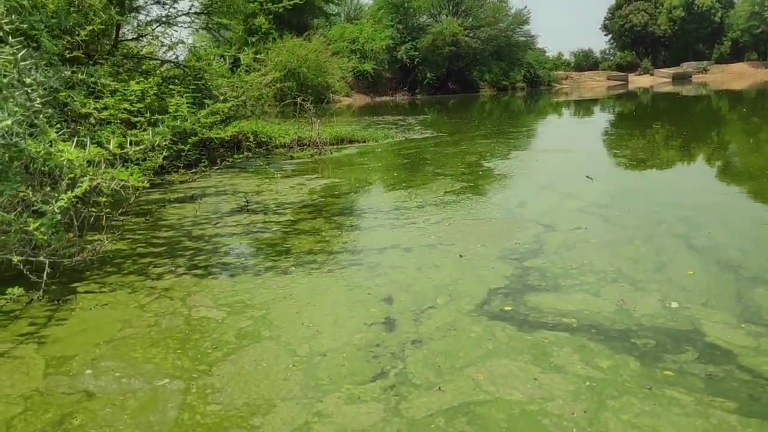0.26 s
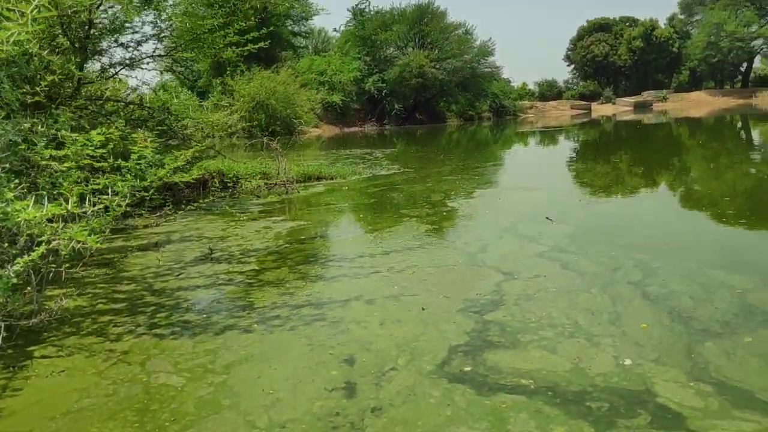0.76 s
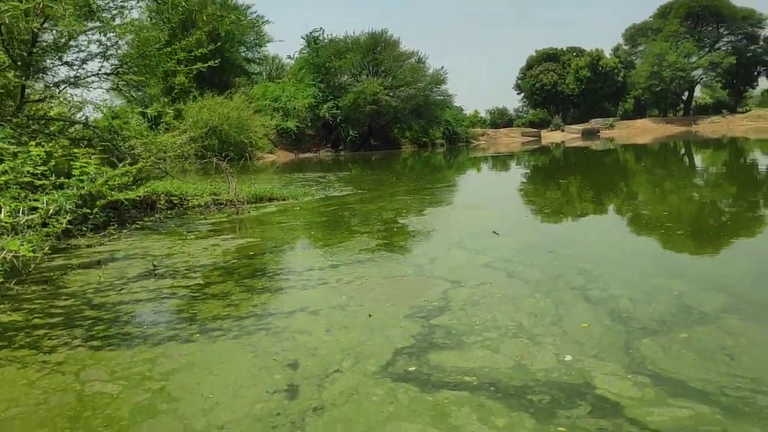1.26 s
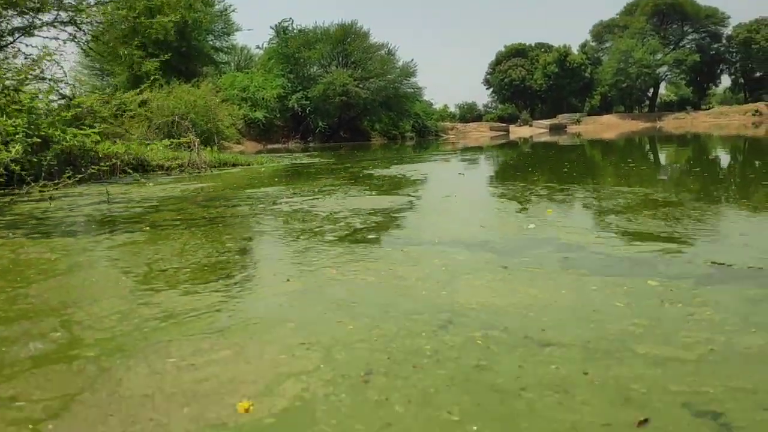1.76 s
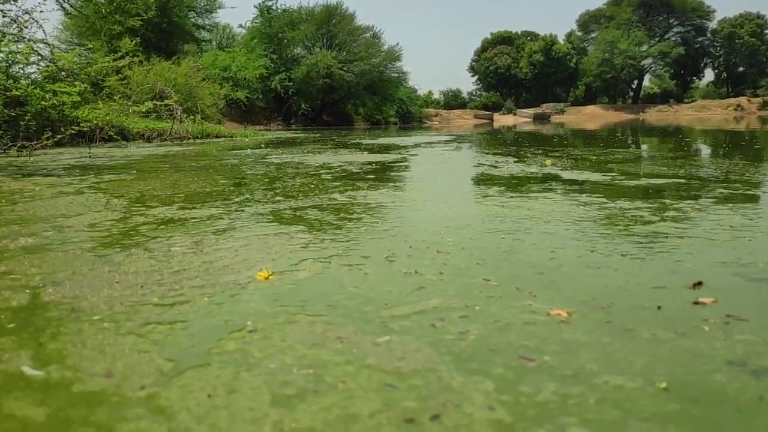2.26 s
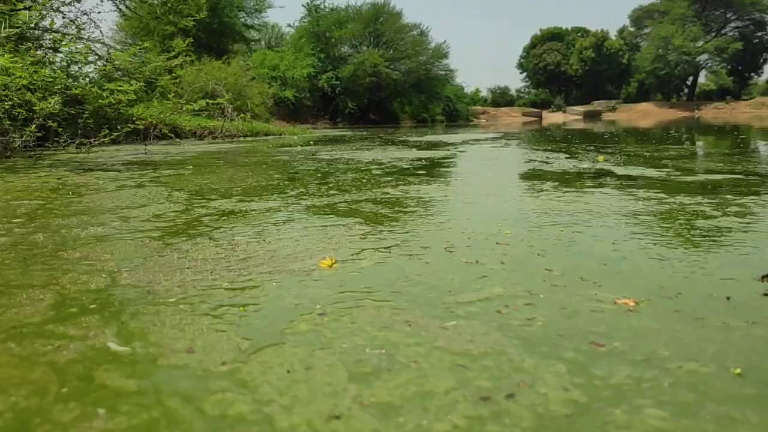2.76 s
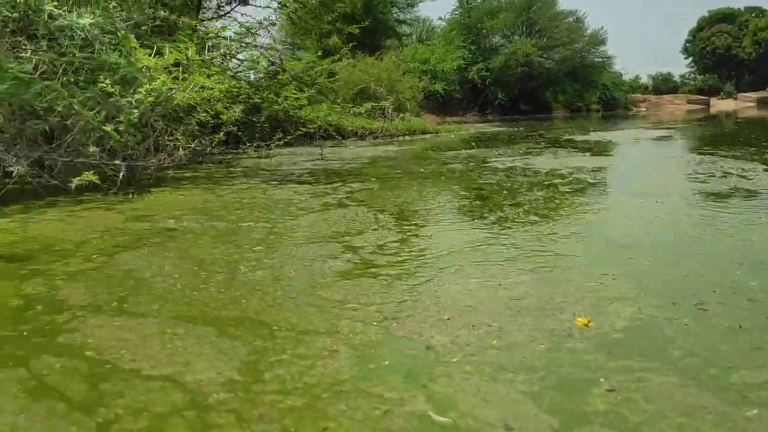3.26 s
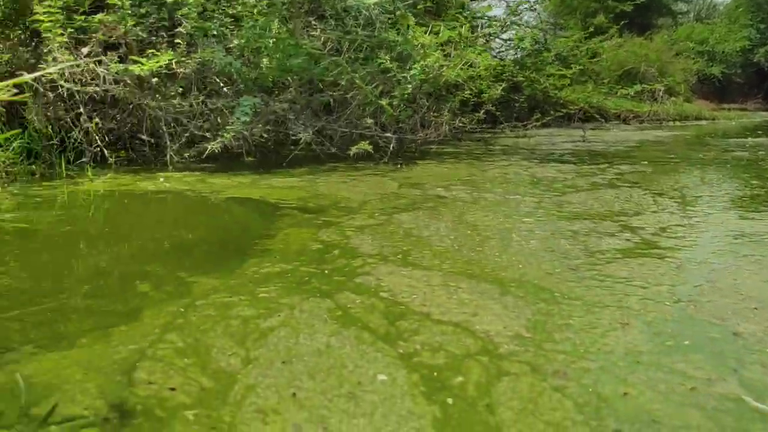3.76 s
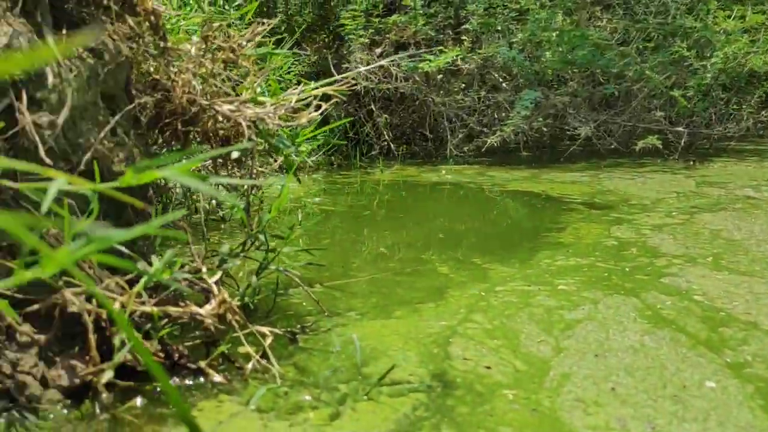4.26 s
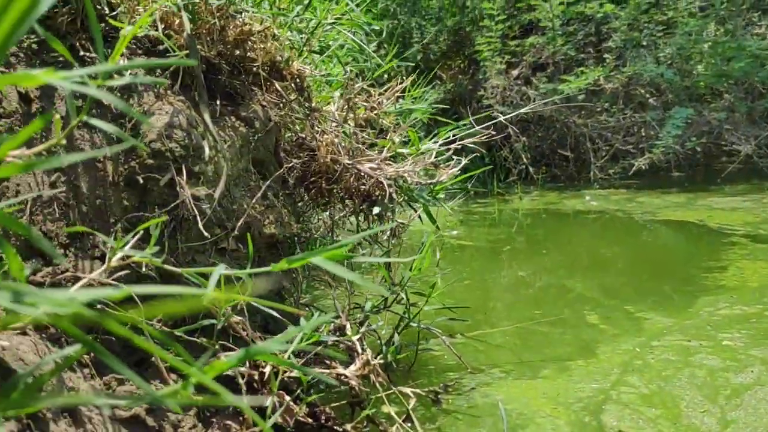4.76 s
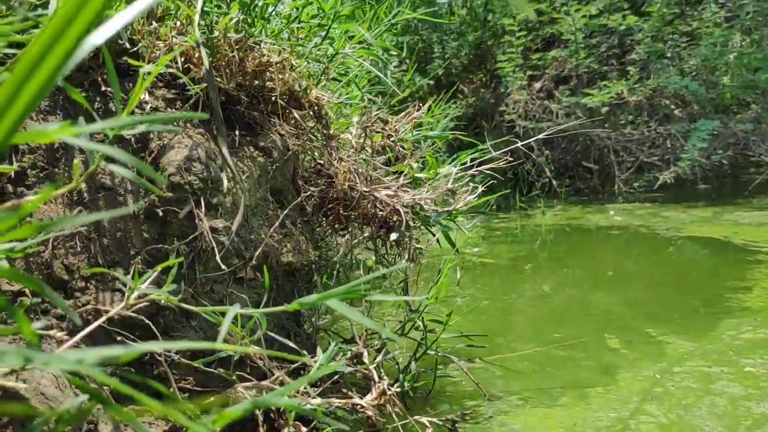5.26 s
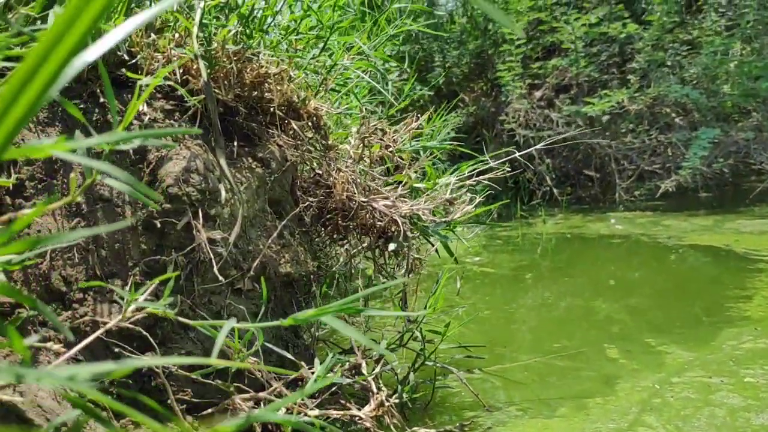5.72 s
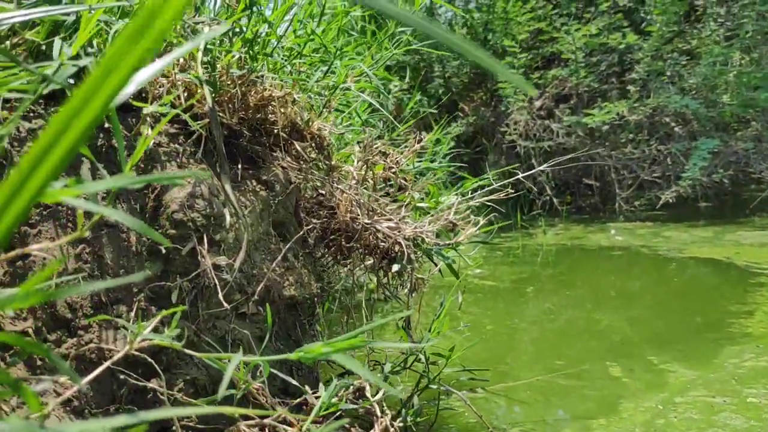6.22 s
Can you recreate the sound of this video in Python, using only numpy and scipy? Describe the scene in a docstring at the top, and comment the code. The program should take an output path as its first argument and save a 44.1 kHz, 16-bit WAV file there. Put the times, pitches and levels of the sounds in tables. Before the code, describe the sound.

Unbroken high insect buzz outdoors, raspy bird scolding and small chirps early on, finger ticks, a burst of grass crackle on the right, final wind thumps.

```python
"""Cicadas shrill in the bushes round a pond: click trains ring and merge into a shimmer, and some swell out.
One bird scolds in short rasps of pulses and noise shaped by its throat; another whistles low from far
off, and small birds chirp, all in gliding, nearly pure notes. Fingers tick on the hand-held camera and
grass flicks and brushes it, made of tiny slips and hollow knocks. A light wind, made of coloured noise,
buffets the microphones."""
import sys
import numpy as np
from scipy import signal
from scipy.fft import irfft, next_fast_len
from scipy.io import wavfile
from scipy.ndimage import uniform_filter1d

SR = 44100
rng = np.random.default_rng(int(sys.argv[2]) if len(sys.argv) > 2 else 0)


def inscribe(sig):
    """Save sig as 16-bit PCM at rate SR to the path in sys.argv[1].

    A 1-D sig is mono; a 2-D sig holds one channel per row.
    Samples are clipped to [-1, 1] before scaling.
    """
    pcm = np.round(np.clip(np.atleast_2d(sig).T, -1, 1) * 32767)
    wavfile.write(sys.argv[1], SR, pcm.astype(np.int16))


N = 286193
TIME = np.arange(N) / SR  # seconds

# In all tables, a left-right level is positive when the left side is louder.
# How strong each pitch is in the chorus: [f/Hz, relative level/dB per Hz]
CHORUS_SPECTRUM = [(3000, -35.5), (4200, -31.5), (4900, -18.5), (5350, -7), (5650, 0), (6100, -2),
                   (6600, 0.5), (6950, 1), (7300, -4), (7700, -11), (8200, -15), (9000, -21), (10000, -27),
                   (13000, -45)]
# The chorus over time: [t/s, level/dB, left-right level/dB]
CHORUS_COURSE = [(0.0, -36.5, 1.5), (0.42, -36, -0.5), (0.59, -36.5, 0), (0.89, -35.5, -0.5),
                 (1.64, -37, -2.5), (1.66, -38, -1.5), (2.2, -37.5, -1.5), (2.76, -37, -1.5),
                 (3.56, -37, 1), (4.3, -35.5, -2), (4.72, -35.5, -3), (5.39, -35.5, -2.5),
                 (6.45, -36.5, -1.5), (6.49, -37.5, -3)]
# Extra level of the left side at each pitch: [f/Hz, level/dB]
CHORUS_LEFT_BOOST = [(4500, 4.5), (5500, 2), (6300, 2.5), (7200, -3.5), (8200, 1.5), (9500, 3)]


def cicadas(click_hz=330, jitter=0.07, far_db=-2, flutter_db=0.48, scatter_t60_s=0.072, count=10,
            strand_db=1.4, drift_db=1.53):
    """Each insect buckles its tymbals in a fast click train; many far ones merge into an even shimmer."""
    near = np.zeros(N)
    for _ in range(count):
        rate_hz = click_hz * rng.uniform(0.5, 1.5) * (1 + jitter * wander(40))
        turns = np.cumsum(rate_hz) / SR
        clicks = np.diff(np.floor(turns), prepend=0)  # one click per whole turn
        song = evened(resonate(clicks, rng.uniform(3990, 7350), 5100))
        near = near + banks(song[None], scatter_t60_s)  # leaves scatter each song along its own paths
    chorus = evened(near) + amp(far_db) * noise_pair(0)

    hz, _, bands = signal.stft(chorus, SR, nperseg=1024)
    # neighbouring pitches come and go in narrow strands
    strands = smooth_patches(bands.shape, pitches=2, frames=10)
    # wider parts of the chorus shift slowly in loudness
    drift = smooth_patches(bands.shape, pitches=9, frames=45)
    spectrum_db = read(CHORUS_SPECTRUM, hz)[:, None]
    bands = bands * amp(spectrum_db + strand_db * strands + drift_db * drift)
    bands[0] *= amp(read(CHORUS_LEFT_BOOST, hz))[:, None]
    chorus = evened(signal.istft(bands, SR, nperseg=1024)[1][:, :N])

    level_db, side_db = follow(CHORUS_COURSE)
    return chorus * amp(level_db + flutter_db * wander(42)) * panned(side_db)


# Single cicadas that swell out of the chorus:
# [middle t/s, length t/s, f/Hz, peak level/dB, left-right level/dB]
CICADA_SWELLS = [(0.303, 0.96, 5660, -46.5, 13), (.44, 0.34, 6260, -42, 4), (1.42, 0.43, 5730, -41.5, -4),
                 (2.298, 1.8, 5690, -45, 2), (2.903, 0.54, 5950, -42.5, 0), (3.223, 0.27, 6020, -41.5, 0),
                 (3.6, 0.94, 5620, -51, 17), (4.267, 0.74, 5700, -42, -2.5), (4.303, 0.4, 6730, -42, -13),
                 (4.246, 1.6, 6200, -40, -12), (5.045, 1.5, 5760, -48.5, -14), (5.75, 1.3, 5860, -55, 16)]


def soloists(width_hz=380):
    """Nearer cicadas rise and sink again, each from its own side and on its own shrill resonance."""
    buzz = noise_pair(0)
    out = np.zeros((2, N))
    for middle, length, hz, db, side_db in CICADA_SWELLS:
        song = evened(resonate(buzz, hz, width_hz))
        out += amp(db) * song * arch(middle, length) * panned(side_db)
    return out


# One cicada's bouts on a thin steady note: [middle t/s, length t/s, peak level/dB]
THIN_NOTE_BOUTS = [(3.0, 1.1, -53), (5.584, 3.3, -48.5)]
# The faint hiss above the chorus: [f/Hz, relative level/dB per Hz]
FIZZ_SPECTRUM = [(8500, -37), (10000, -2.5), (11400, 5.5), (12400, 4), (14200, -5.5)]


def cicada_top(note_hz=7430, width_hz=100, fizz_db=-24, fizz_side_db=12.5):
    """Narrow noise makes one thin note; high noise makes a faint fizz that follows the chorus."""
    bouts = sum(amp(db) * arch(middle, length) for middle, length, db in THIN_NOTE_BOUTS)
    note = evened(resonate(noise_pair(0), note_hz, width_hz)) * bouts
    level_db, side_db = follow(CHORUS_COURSE)
    fizz = evened(colour(noise_pair(0), FIZZ_SPECTRUM))
    # fizz level and left-right level are relative to the chorus
    return note + fizz * amp(level_db + fizz_db) * panned(side_db + fizz_side_db)


# Scolding rasps, about four a second in two bouts:
# [middle t/s, length t/s, level/dB, throat tilt/dB per octave]
SCOLD_RASPS = [(0.146, 0.036, -50.5, -1), (0.373, 0.035, -48.5, 1), (0.655, 0.036, -48, -0.5),
               (0.912, .032, -49, 1), (1.128, 0.031, -50.5, -3), (1.373, 0.029, -53, -2),
               (2.03, 0.03, -54, -7), (2.248, .027, -49, 0.5), (2.48, 0.026, -49, -5),
               (2.734, 0.022, -48.5, -2.5), (2.953, 0.029, -53.5, -6), (3.171, 0.032, -53.5, -0.5),
               (3.418, 0.022, -53.5, 3)]
# Resonances of the bird's throat: [f/Hz, width of one filter pass/Hz, relative level/dB]
THROAT_RESONANCES = [(498, 135, -16.5), (1670, 1100, -23), (2173, 620, -18), (2500, 170, -7.5),
                     (2820, 330, -10.5), (3015, 180, -12), (3740, 200, -9), (4320, 230, -11.5)]


def scolding_bird(pulse_hz=520, jitter=0.1, rough=0.84, spit_db=-19, rattle_db=-1.5, shift=0.051,
                  vary_db=1, tilt_hz=2600, skirt_db=-5.5, skirt_s=0.014):
    """Ragged pulses and gated noise ring a throat that sits a little differently in each abrupt rasp."""
    turns = np.cumsum(pulse_hz * (1 + jitter * wander(220))) / SR
    pulses = evened(np.diff(np.floor(turns), prepend=0))
    breath = evened(noise_pair(0) * np.exp(-(turns % 1) / 0.5))  # fades after each pulse
    drive = (pulses + rough * breath) * amp(rattle_db * wander(360))

    out = np.zeros((2, N))
    t = TIME[:SR // 8] - TIME[SR // 16]
    skirt = amp(skirt_db) * np.exp(-abs(t) / skirt_s)  # soft lead into and out of the rasp
    for middle, length, level_db, tilt_db in SCOLD_RASPS:
        puff = drive[:, round(middle * SR):][:, :len(t)]
        voice = amp(spit_db) * resonate(puff, 3360, 6300)
        for hz, width, db in THROAT_RESONANCES:
            level_chance, pitch_chance = rng.standard_normal(2)
            tilt = tilt_db * max(np.log2(hz / tilt_hz), -0.5)  # pivots at tilt_hz
            gain = amp(db + vary_db * level_chance + tilt)
            voice += gain * resonate(puff, hz * (1 + shift * pitch_chance), width)
        gate = np.exp(-(2 * t / length) ** 6)  # nearly flat, with abrupt ends
        add(out, middle + t[0], amp(level_db) * evened(voice) * np.maximum(gate, skirt))
    return out * panned(0.86)


# Small birds' chirps:
# [start t/s, length t/s, f/Hz, glide/octaves, arch/octaves (negative dips), level/dB]
BIRD_CHIRPS = [(.015, .047, 2580, .15, .02, -62.5), (.144, 0.015, 2450, 0.19, 0.0068, -51),
               (.168, 0.028, 2700, .08, .02, -72), (.399, 0.016, 2850, 0.15, 0.095, -49.5),
               (.44, 0.077, 2580, 0.051, .03, -65), (.468, 0.03, 2150, 0.21, -0.085, -62),
               (.526, 0.028, 3170, -0.042, 0.051, -50), (.676, .014, 3140, .05, .03, -54.5),
               (.750, 0.017, 3260, .22, 0.18, -52), (.762, 0.021, 2880, -0.086, 0.1, -51.5),
               (.84, 0.029, 2200, 0.35, -.11, -67), (.911, 0.02, 3160, 0.23, -0.049, -49.5),
               (1.17, 0.038, 2460, -0.069, -.04, -66.5), (1.22, .06, 2550, -0.077, -0.062, -71),
               (1.82, 0.038, 3380, -0.35, 0, -69), (2.11, 0.063, 2690, 0.38, 0, -64),
               (2.318, 0.058, 2025, -0.51, 0.071, -58), (2.4, .058, 2315, 0.08, .066, -64.5),
               (2.545, 0.075, 1785, 0.07, -0.002, -68), (2.57, 0.038, 2270, .1, .04, -70),
               (2.837, .014, 3740, -0.16, 0, -62), (2.846, 0.022, 3250, -0.045, -.02, -55.5),
               (2.893, .025, 2670, .05, .03, -66), (2.895, 0.045, 2170, 0.073, 0, -68),
               (2.978, 0.059, 2224, 0.17, -0.29, -60.5), (3.034, 0.046, 3170, 0.24, -0.018, -57),
               (3.072, 0.017, 2900, -0.22, 0.052, -56), (3.24, 0.06, 2060, -0.043, 0.072, -78),
               (3.435, 0.037, 2740, -0.14, -.02, -67), (3.46, .026, 2890, 0.065, -0.079, -63.5),
               (3.525, 0.039, 2320, 0.12, -0.13, -62), (3.572, 0.029, 3070, 0.058, 0.032, -66),
               (3.585, 0.05, 2600, -0.059, .02, -68), (3.632, 0.047, 3010, -0.089, 0.043, -66),
               (5.0, .07, 2350, -.27, 0.0021, -65), (5.33, 0.085, 4150, 0.4, 0.013, -63.5),
               (5.452, 0.028, 3650, -0.23, .03, -64), (5.46, 0.046, 2930, 0.15, -.01, -63.5),
               (5.52, 0.031, 3020, .23, -.046, -56.5), (5.58, 0.079, 3930, .17, -0.087, -65.5),
               (5.706, .02, 3350, -.12, .02, -65), (5.712, 0.018, 2860, -.1, -.085, -56),
               (5.788, .043, 2010, 0.71, 0.095, -64), (5.931, 0.032, 3210, -0.48, 0.13, -48),
               (5.962, 0.027, 2600, -0.47, 0.017, -56.5), (6.10, 0.05, 3000, -.08, .03, -63.5),
               (6.37, 0.068, 4050, 0.2, -0.085, -64)]


def small_birds():
    """Short, high, nearly pure notes glide up or down with a quick waver."""
    return notes(BIRD_CHIRPS, waver=0.022, waver_hz=202, flicker_db=2.5, side_db=1.0)


# Low far whistles: [start t/s, f/Hz, glide/octaves, level/dB]
FAR_WHISTLES = [(.815, 1272, -0.0095, -64.5), (1.169, 1370, -0.015, -67), (1.586, 1297, -0.22, -66),
                (1.87, 1388, 0.11, -65.5), (1.946, 1272, -0.18, -59.5), (2.169, 1394, 0.068, -62.5),
                (2.328, 1245, 0.134, -60), (2.499, 1350, 0.03, -65.5), (2.71, 1120, 0.16, -64),
                (2.852, 1313, 0.016, -65.5)]


def whistling_bird(length_s=0.11, arch_octaves=0.09):
    """Low, nearly pure notes of equal length arch gently as they glide."""
    rows = [(s, length_s, hz, glide, arch_octaves, db) for s, hz, glide, db in FAR_WHISTLES]
    return notes(rows, waver=0.017, waver_hz=90, flicker_db=1.5, side_db=-4.0)


def notes(rows, waver, waver_hz, flicker_db, side_db):
    """Nearly pure bird notes, each a glide that arches or dips in pitch."""
    out, drift, flicker = np.zeros((2, N)), wander(waver_hz), wander(165)
    for s, length, pitch_hz, glide, arch_octaves, db in rows:
        u = np.linspace(-0.5, 0.5, round(length * SR))  # place within the note
        at = np.arange(len(u)) + round(s * SR)
        bend = glide * u - arch_octaves * (2 * u) ** 2
        hz = pitch_hz * 2 ** bend * (1 + waver * drift[at])
        tone = np.sqrt(2) * np.sin(2 * np.pi * np.cumsum(hz) / SR)
        add(out, s, amp(db + flicker_db * flicker[at]) * np.cos(np.pi * u) * tone)
    return out * panned(side_db)


# Fingers ticking on the case:
# [t/s, level/dB, left-right level/dB, knock f/Hz, brightness f/Hz, decay t/s]
FINGER_TICKS = [(0.064, -40, 15, 1130, 5600, 0.00084), (0.284, -53, -1.5, 690, 5200, 0.0012),
                (.551, -43.5, -3, 690, 3940, 0.00076), (0.747, -47.5, 17, 430, 4770, 0.0042),
                (.756, -51, 26, 900, 11000, 0.00049), (0.819, -42.5, 4, 337, 3000, 0.0023),
                (1.149, -44, -11, 600, 1720, 0.0019), (1.35, -53.5, 4, 594, 1500, 0.0022),
                (1.412, -41, -19, 490, 1200, 0.008), (1.43, -35.5, -19, 580, 2830, 0.0022)]
# How the case colours a tick: [f/Hz, relative level/dB]
CASE_SPECTRUM = [(80, 0.5), (200, 3), (400, -3.5), (650, -2), (1000, -7), (2000, -7), (4000, -11),
                 (9000, -8)]


def fingers():
    """Fingers tick on either side of the case, each a push with small slips and a hollow knock."""
    out = np.zeros((2, N))
    for s, db, side_db, knock_hz, bright_hz, decay in FINGER_TICKS:
        start, sound = tap(s, db, knock_hz, bright_hz, decay, CASE_SPECTRUM, grit=1.0, lead=0.79,
                           snap_db=-4.5, snap_db_per_octave=15.0, ring=0.21)
        add(out, start, sound * panned(side_db))
    return out


# Grass blades flicking the right microphone:
# [t/s, level/dB, knock f/Hz, brightness f/Hz, decay t/s]
GRASS_FLICKS = [(3.882, -41, 725, 1150, 0.0014), (3.896, -50, 1120, 1400, 0.0093),
                (3.908, -60, 1650, 1900, 0.0065), (3.948, -49, 377, 600, 0.0055),
                (3.965, -40, 696, 1330, .0016), (3.987, -45, 600, 1200, 0.0091),
                (3.995, -49, 910, 1500, 0.00044), (4.022, -47, 675, 2360, .00069),
                (4.037, -56, 600, 1200, .0011), (4.055, -47.5, 646, 1400, 0.00098),
                (4.066, -45.5, 895, 1600, 0.00084), (4.168, -43.5, 910, 2600, 0.002),
                (4.234, -54, 910, 3000, .00091), (4.308, -42.5, 880, 6530, 0.0032),
                (4.311, -38.5, 2490, 13000, 0.00024), (4.32, -59, 2500, 6000, .0005),
                (4.336, -55, 3000, 8000, .0003), (4.347, -38, 740, 4500, 0.0033),
                (4.3504, -42.5, 1200, 8000, .00025), (4.358, -41, 565, 4500, 0.003),
                (4.373, -43, 910, 3000, .0006), (4.388, -47, 1200, 5000, 0.0013),
                (4.414, -39.5, 950, 4500, 0.0056), (4.4283, -37.5, 690, 13000, 0.0006),
                (4.429, -36, 700, 9000, 0.01), (4.457, -51, 810, 2500, .003),
                (4.49, -50, 880, 3500, 0.0039), (4.586, -40, 242, 600, 0.0039),
                (4.591, -43.5, 600, 12000, 0.0012), (4.601, -45, 504, 13000, .0003),
                (4.61, -49, 900, 13000, 0.00046), (4.622, -46, 1300, 9000, 0.0023),
                (4.6279, -38, 2600, 13100, 0.00023), (4.631, -44, 1300, 9000, 0.004)]
# The colour of a flick: [f/Hz, relative level/dB]
GRASS_SPECTRUM = [(100, 1), (300, -2.5), (650, -1), (1000, -2), (1600, -3.5), (3000, -4), (5000, -4),
                  (9000, -2)]


def grass(side_db=-29):
    """Blades flick against the right microphone, each a tiny push with slips and a hollow knock."""
    out = np.zeros((2, N))
    for row in GRASS_FLICKS:
        start, sound = tap(*row, GRASS_SPECTRUM, grit=0.77, lead=0.74,
                           snap_db=-9.5, snap_db_per_octave=4.0, ring=0.22)
        add(out, start, sound)
    return out * panned(side_db)


# The colour of the sharp snap in a touch: [f/Hz, relative level/dB]
SNAP_SPECTRUM = [(1000, -11), (3000, 24.5), (6000, -41), (9000, 23), (13500, 26.5)]


def tap(s, db, knock_hz, bright_hz, decay, body_colour, grit, lead, snap_db, snap_db_per_octave, ring):
    """Slips swell to a small push and die away through the case; a brighter touch snaps harder."""
    t = TIME[:SR // 12] - TIME[SR // 50]
    swell = np.exp(-abs(t) / np.where(t < 0, lead * decay, decay))
    slips = rng.standard_normal((2, len(t))) * (rng.random((2, len(t))) < 0.12) * swell
    push = t == 0
    body = colour(push + grit * slips, body_colour)
    # each spot on the case has its own hollow note
    body = evened(body) + ring * evened(resonate(body, knock_hz, 0.92 * knock_hz))
    # a softer touch is duller
    b, a = signal.butter(2, min(bright_hz, SR / 3), fs=SR)
    body = signal.lfilter(b, a, body)
    snap = colour(slips, SNAP_SPECTRUM)
    # snap_db holds at 4000 Hz brightness; above 9000 Hz the snap gets no harder
    edge_db = db + snap_db + snap_db_per_octave * np.log2(min(bright_hz, 9000) / 4000)
    sound = amp(db) * unit_energy(body) + amp(edge_db) * unit_energy(snap)
    return s + t[0], np.sqrt(SR // 100) * sound  # levels hold over a hundredth of a second


# Strokes of grass sliding over the microphone: [peak t/s, decay t/s, level/dB]
BRUSH_STROKES = [(4.0, 0.18, -56), (4.08, 0.022, -59.5), (4.229, 0.081, -53.5), (4.36, 0.029, -46.5),
                 (4.445, 0.031, -55), (4.495, 0.015, -55), (4.619, 0.024, -42.5), (4.649, 0.11, -55),
                 (4.924, 0.06, -58.5), (5.044, 0.018, -53.5)]
# The colour of the sliding: [f/Hz, relative level/dB per Hz]
BRUSH_SPECTRUM = [(80, -10), (250, -3), (700, -7.5), (1500, -6.5), (3000, -9), (6000, -13), (9000, -7),
                  (14000, -29)]


def brushing(grains_per_s=6000, clump_db=2.0):
    """Grass slides over the right microphone in clumps of tiny slips."""
    chosen = rng.random((2, N)) < grains_per_s / SR
    slips = rng.standard_normal((2, N)) * chosen * amp(clump_db * wander(130))
    strokes = sum(amp(db) * surge(s, decay, lead=0.6) for s, decay, db in BRUSH_STROKES)
    return evened(colour(slips, BRUSH_SPECTRUM)) * strokes * panned(-45)


def banks(x, t60):
    """Bushes and banks scatter a thin tail of echoes that falls by 60 dB in t60 seconds."""
    t = TIME[:SR // 2]
    chosen = rng.random((2, len(t))) < 1500 / SR  # about 1500 echoes a second
    taps = rng.standard_normal((2, len(t))) * chosen * amp(-60 * t / t60)
    return signal.oaconvolve(x, taps / np.linalg.norm(taps[0]), axes=1)[:, :N]


# Still outdoor air: [f/Hz, relative level/dB per Hz]
AIR_SPECTRUM = [(20, 4.5), (50, 3.5), (85, -3.5), (130, -5), (250, -14), (500, -19), (1000, -31),
                (1700, -26.5), (2700, -26.5), (4200, -71), (6000, -54)]
# Gusts on the microphones: [peak t/s, decay t/s, level/dB, left-right level/dB]
WIND_GUSTS = [(1.17, 0.06, -42.5, 5), (1.49, 0.096, -45.5, -23), (4.13, 0.041, -51.5, 6),
              (4.55, 0.1, -45, 4), (4.94, 0.026, -41, 15), (5.14, 0.18, -49.5, -6), (5.92, 0.14, -51, -20),
              (6.17, 0.1, -34, -6), (6.37, 0.058, -32, -17)]
# The low rumble of a gust: [f/Hz, relative level/dB per Hz]
GUST_SPECTRUM = [(15, 3.5), (40, 4), (60, -2), (85, -1), (150, -14.5), (250, -27), (500, -85), (1000, -46)]


def air(air_db=-58, lump_db=2):
    """Still air is soft steady noise; lumpy gusts are low noise unrelated at each microphone."""
    still = amp(air_db) * evened(colour(noise_pair(0.61), AIR_SPECTRUM))
    force = sum(amp(db) * surge(s, decay, lead=1.0) * panned(side_db)
                for s, decay, db, side_db in WIND_GUSTS)
    gusts = evened(colour(noise_pair(0), GUST_SPECTRUM)) * force * amp(lump_db * wander(21))
    return still + gusts


def amp(db):
    """Turns decibels into gain."""
    return 10 ** (np.asarray(db) / 20)


def evened(x):
    """Scales to rms 1."""
    return x / np.sqrt(np.mean(x ** 2) + 1e-20)


def unit_energy(x):
    """Scales each channel to energy 1."""
    return x / np.linalg.norm(x, axis=1, keepdims=True)


def read(points, hz):
    """Reads a spectrum on a log-frequency axis."""
    f, value = np.transpose(points)
    return np.interp(np.log(hz + 1), np.log(f + 1), value)


def follow(rows):
    """Reads every column of a curve at every sample."""
    s, *columns = np.transpose(rows)
    return [np.interp(TIME, s, c) for c in columns]


def panned(side_db):
    """Left and right gains of mean power 1."""
    gains = amp(np.array([side_db, -side_db]).reshape(2, -1) / 2)
    return gains / np.sqrt(np.mean(gains ** 2, 0))


def add(mix, s, sound):
    """Mixes a sound in at time s."""
    part = mix[:, max(round(s * SR), 0):][:, :sound.shape[-1]]
    part += sound[..., :part.shape[1]]


def colour(x, points):
    """Gives a sound the listed spectrum, with a filter that never rings ahead of time."""
    size = 4096
    log_gain = np.log(amp(read(points, abs(np.fft.fftfreq(size, 1 / SR)))))
    # the Hilbert transform finds the phase that goes with this gain
    response = np.exp(np.conj(signal.hilbert(log_gain)))
    ring = np.fft.ifft(response).real[:size // 2]
    ring = ring.reshape((1,) * (x.ndim - 1) + (-1,))
    return signal.oaconvolve(x, ring, axes=-1)[..., :x.shape[-1]]


def resonate(x, hz, width):
    """A resonance of gain 1, applied twice for steep skirts."""
    b, a = signal.iirpeak(hz, hz / width, SR)
    return signal.lfilter(b, a, signal.lfilter(b, a, x))


def wander(rate_hz):
    """A random curve of rms 1 that fluctuates faster for a higher rate."""
    hz = np.fft.rfftfreq(N, 1 / SR)[:2000]
    chance = rng.standard_normal((len(hz), 2)) @ [1, 1j]
    spectrum = chance / (1 + (hz / rate_hz) ** 2)
    return evened(irfft(spectrum * (hz > 0), next_fast_len(N))[:N])


def smooth_patches(shape, pitches, frames):
    """Random patches of rms 1, smoothed over neighbouring pitches and time frames."""
    over_pitch = uniform_filter1d(rng.standard_normal(shape), size=pitches, axis=1)
    return evened(uniform_filter1d(over_pitch, size=frames, axis=2))


def noise_pair(likeness):
    """Noise at two microphones, partly shared."""
    a, b = rng.standard_normal((2, N))
    c = np.clip(likeness, -1, 1)
    return np.array([a, c * a + np.sqrt(1 - c ** 2) * b])


def left_later(x, count):
    """A sound reaches the left microphone a few samples after the right."""
    return np.array([np.roll(x[0], count), x[1]])


def arch(middle, length):
    """A smooth rise and fall, silent outside its length."""
    return np.cos(np.pi * np.clip((TIME - middle) / length, -0.5, 0.5))


def surge(s, decay, lead):
    """Builds up to time s and dies away; lead is the build-up as a share of the decay."""
    return np.exp(-abs(TIME - s) / np.where(TIME < s, lead * decay, decay))


def scene():
    """Insects and birds round the pond, handling, grass and wind at the camera."""
    insects = cicadas() + soloists() + cicada_top()
    near_birds = left_later(scolding_bird() + small_birds(), count=3)
    whistles = left_later(whistling_bird(), count=7)
    echoes = amp(-3.5) * banks(near_birds, t60=0.19) + amp(-5.0) * banks(whistles, t60=0.33)
    touches = fingers() + grass() + brushing()
    return insects + near_birds + whistles + echoes + touches + air()


def record(dry):
    """Removes the treble above about 14400 Hz, the recorder's band limit."""
    lowpass = signal.firwin(401, 14400, window=("kaiser", 8), fs=SR)
    return signal.oaconvolve(dry, lowpass[None], "same")


dry = scene()
out = record(dry)
inscribe(out)
```